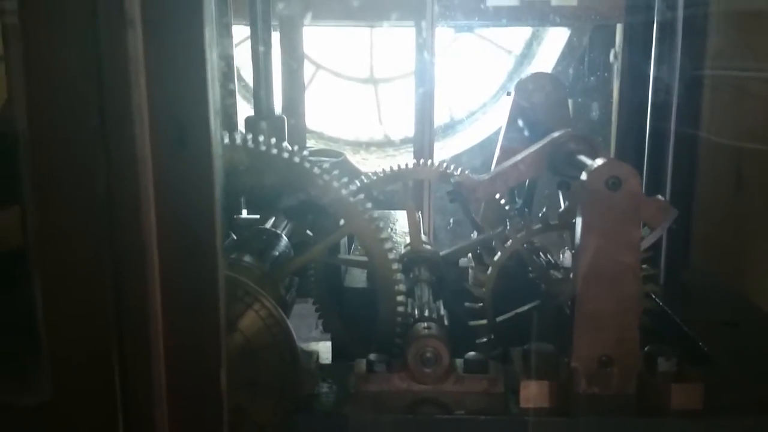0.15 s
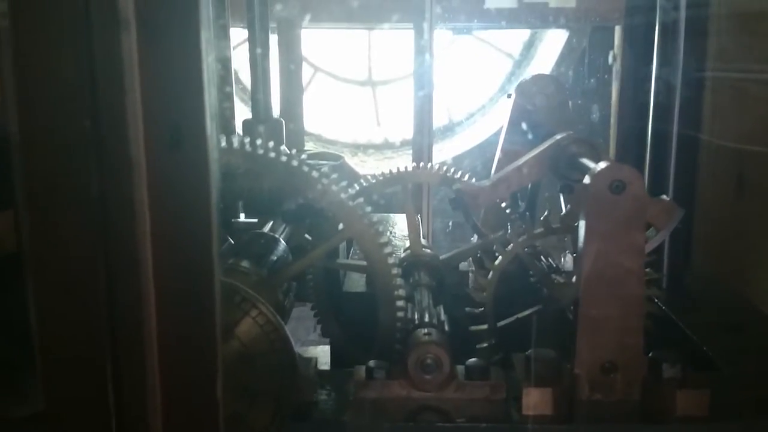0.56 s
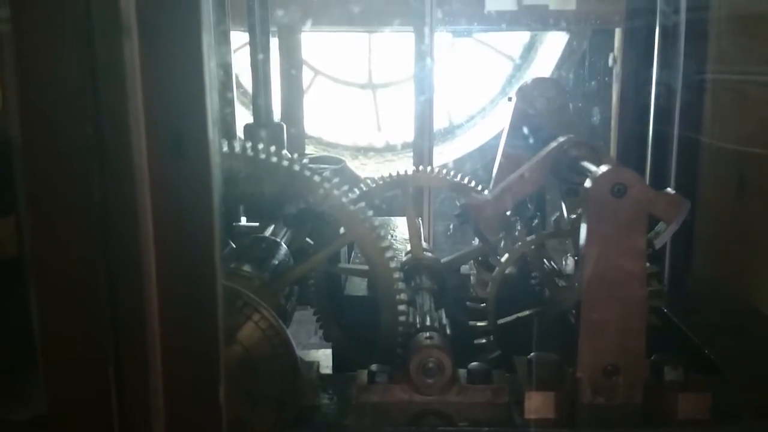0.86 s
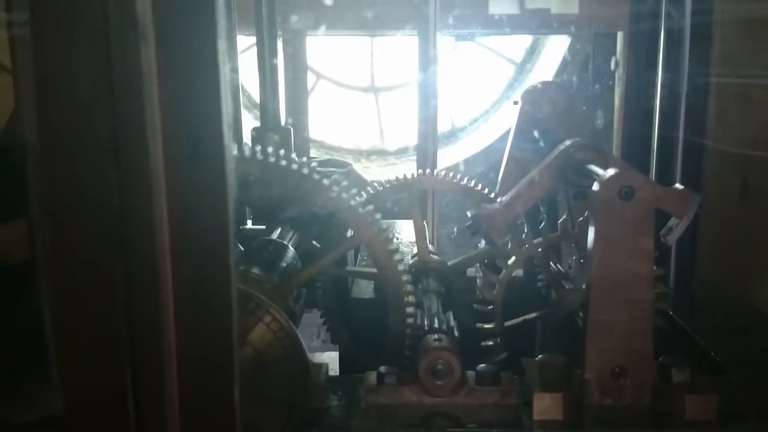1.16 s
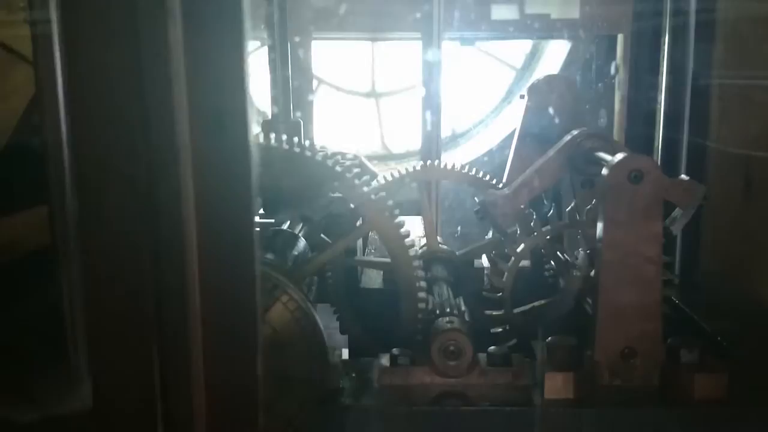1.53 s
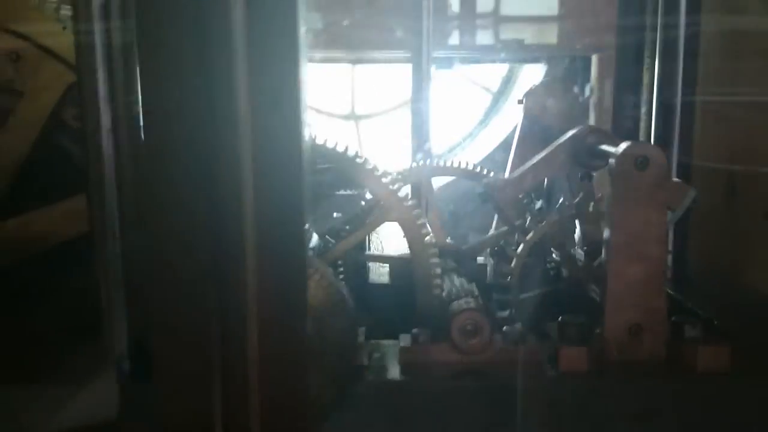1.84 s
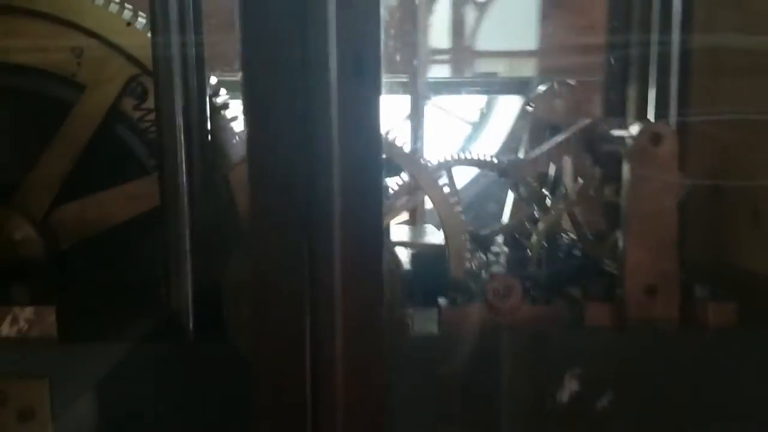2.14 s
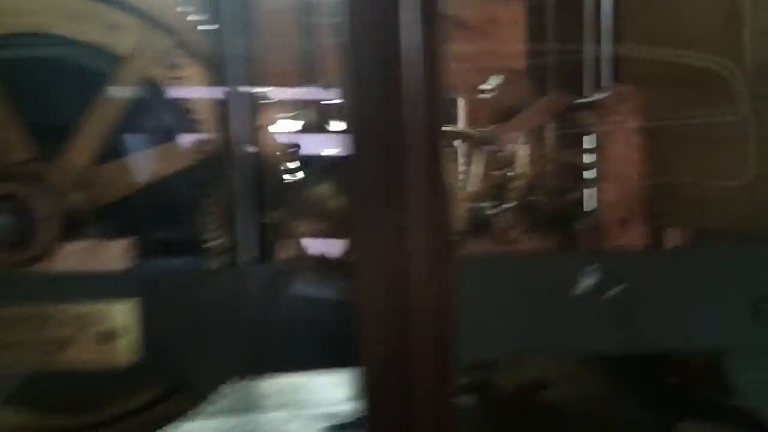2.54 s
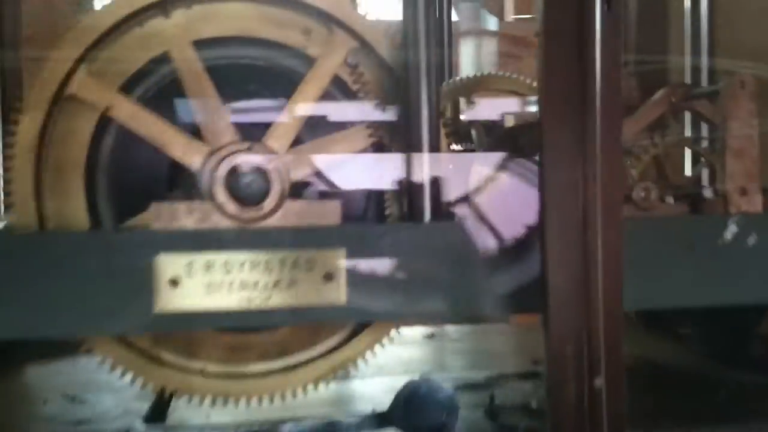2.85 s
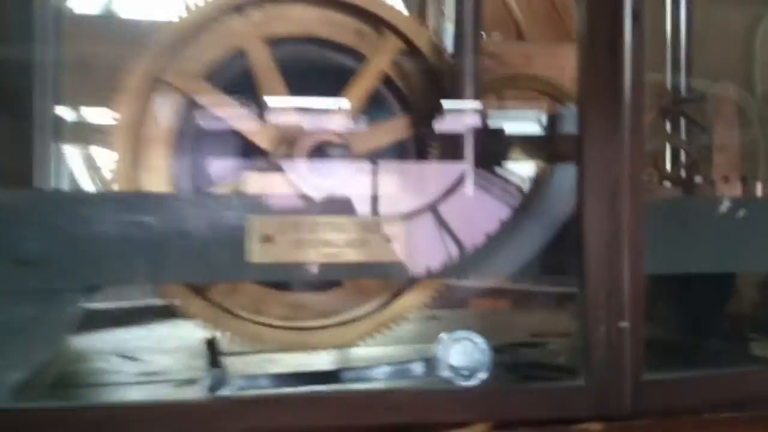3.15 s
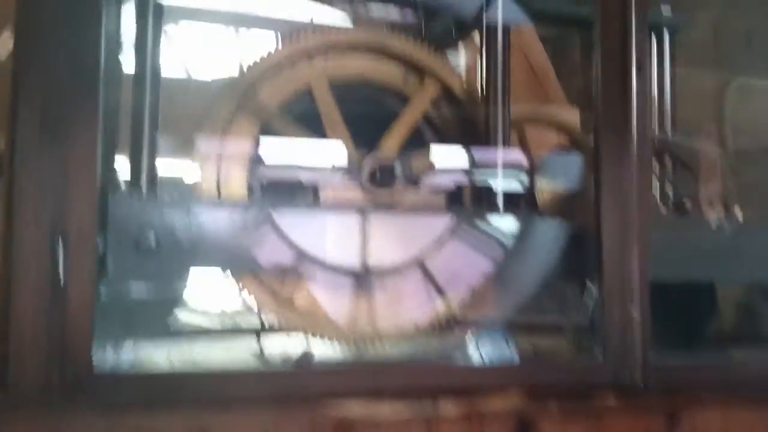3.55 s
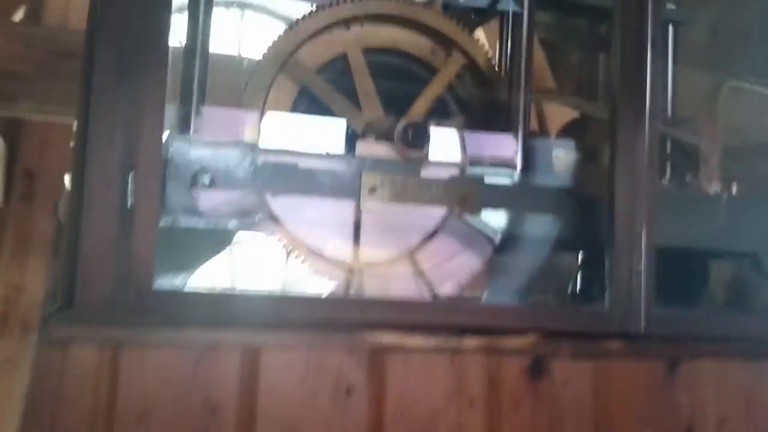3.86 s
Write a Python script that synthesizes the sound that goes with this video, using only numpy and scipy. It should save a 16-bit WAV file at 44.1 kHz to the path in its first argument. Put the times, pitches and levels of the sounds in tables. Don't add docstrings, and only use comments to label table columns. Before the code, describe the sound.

A tower clock movement clunks softly about once a second, tick and tock alternating, in a hushed room; a sharp click and bump come midway, then rubbing and heavy handling thumps on the recorder's right side.

```python
import sys
import numpy as np
from scipy import signal
from scipy.fft import rfft, irfft
from scipy.io import wavfile

SR = 44100
rng = np.random.default_rng(int(sys.argv[2]) if len(sys.argv) > 2 else 0)


def persist_wave(psi):
    counts = np.round(np.clip(psi, -1, 1) * 32767).astype(np.int16)
    wavfile.write(sys.argv[1], SR, np.atleast_2d(counts).T)


def gain_from_decibels(decibels):
    exponent = np.asarray(decibels, float) / 20
    return 10 ** exponent


N = 176400

# frequency in Hz, level in dB per Hz.
HUSH_SPECTRUM = [(40, 0), (64, -1), (200, -12), (300, -12.5), (800, -10.5), (6500, -21), (15800, -22.5)]
# frequency in Hz, likeness 0-1.
LIKENESS = [(60, 0), (290, 0.74), (640, 0.02), (3000, 0)]
# frequency in Hz, width in Hz, gain in dB.
PORT_PEAKS = [
    [(4550, 670, 0.5)],
    [(5630, 670, 9), (14700, 530, 8.5)],
]
# start in seconds, level in dB, left-right in dB, arbor in Hz, arbor level in dB.
BEATS = [
    (-0.2, -42, 3, 1800, -31),
    (0.803, -47, 0, 1803, -6.5),
    (1.827, -49.5, 3.5, 1845, -17),
    (2.801, -47, 3.5, 1535, -12.5),
    (3.826, -49, 6, 1790, -20),
]
# frequency in Hz, level in dB, t60 in seconds,
# left-right in dB.
TICK_MODES = [(350, -1.5, 0.24, 4), (774, -9, 0.17, -3), (1423, 0.5, 0.051, 6), (3140, -16, 0.078, 23),
              (4730, -6, 0.086, 9), (7000, -13, 0.051, 13), (10080, -10, 0.091, 12), (15400, -6, .1, -9)]
TOCK_MODES = [(291.7, 7.5, 0.22, -5.5), (790, -5, 0.084, 7), (1430, 0.5, 0.056, 7), (4710, -4, 0.043, 2),
              (5040, -8, 0.12, -6), (5340, -8.5, 0.14, 4)]
FRONT_TICK_MODES = [(425.3, 8, 0.32, 2), (738, -1.5, 0.11, 16), (1436, -1.5, 0.068, 9),
                    (4870, -18, 0.078, 2)]
# frequency in Hz, level in dB per Hz.
CLUNK_SPECTRUM = [(120, -22), (300, -2), (850, -4.5), (1150, -12.5), (4800, -15.5), (6500, -24.5),
                  (15500, -21.5)]
# frequency in Hz, t60 in seconds.
CASE_T60 = [(150, 0.74), (400, 0.38), (1000, 0.27), (15000, 0.2)]
# start in seconds, thump in dB, knock in dB, thump in Hz, signed direction.
THUMPS = [(0.105, -79, -46, 69.6, 0.47), (2.3, -57, -59, 60, 1), (2.55, -56, -66, 59.4, 1),
          (0.417, -47.5, -61, 55, -0.79), (2.159, -49.5, -45, 69, 0.61), (2.4106, -23, -8.5, 62.7, 0.73),
          (2.494, -37, -46, 78, -0.83), (2.7995, -23, -20.5, 79, 0.94), (2.9, -52, -30, 70, 0.84),
          (3.384, -41, -27, 97, 1), (3.409, -43, -25, 64.6, 0.6), (3.5193, -18.5, -18.5, 72, -0.51),
          (3.5343, -47, -18, 68.4, -0.75), (3.5403, -47, -21, 69, 1), (3.651, -40, -34.5, 62, -1.1),
          (3.743, -19.5, -18.5, 73.4, -1.2), (3.8111, -45, -16, 71.5, -1.1),
          (3.8148, -2.5, -19.5, 55.6, 0.71), (3.852, -10.5, -71, 52.8, 0.49),
          (3.877, -43, -19.5, 60, -0.52), (3.894, -40, -27, 60, -1), (3.934, -12.5, -25.5, 74.6, 0.57),
          (3.966, -15, -8, 65.6, 0.73)]
# frequency in Hz, level in dB, t60 in seconds.
SHELL_MODES = [(334.5, 4.5, 0.011), (536, -10, 0.015), (1810, -16.5, 0.0059)]
# start in seconds, level in dB, frequency in Hz, time to widest swing in seconds,
# signed direction.
PUSHES = [(1.549, -61, 123.5, 0.016, 0.47), (1.701, -63.5, 119, 0.013, 1),
          (2.409, -17.5, 60, 0.0074, -0.98), (2.492, -27, 88, 0.0043, -1.14),
          (3.105, -38.5, 113, 0.0061, -1.12), (3.262, -46, 62, 0.011, -1), (3.341, -35, 104, 0.01, -0.82),
          (3.381, -14.5, 98, 0.0057, -0.65), (3.414, -20, 64.3, 0.011, 1), (3.54, -22, 318, 0.0049, 0.97),
          (3.673, -32.5, 151.7, 0.0085, 0.94), (3.842, -16.5, 76, 0.01, -1.06),
          (3.651, -17, 59.5, 0.011, -1.03), (3.721, -21, 59.4, 0.011, -1.05),
          (3.8102, -10.5, 127, 0.0055, -0.96)]
# start in seconds, level in dB, left-right in dB, pitch in Hz, broad crack in dB.
SNAPS = [(1.559, -61, -9, 4900, 9), (1.574, -52.5, -6, 5100, 7), (1.605, -64, -7, 12100, 8),
         (2.0047, -54.5, -1, 10500, 9), (2.162, -61, 6, 11500, 13.5), (2.361, -52, 13, 4840, 5),
         (3.107, -42, -15.5, 5300, -5), (3.497, -55, -13, 5320, 11), (3.674, -43, -6, 5660, -15),
         (3.966, -33, 12.5, 4330, -4), (2.491, -59.5, -11, 10000, 12), (2.941, -55, 0, 13500, 2)]
# peak in seconds, length in seconds, hiss in dB, right rumble in dB, left-right in dB.
STROKES = [(2.359, 0.023, -53.5, -79, -7), (2.413, 0.15, -58, -57.5, 0), (2.656, 0.039, -63, -63.5, 5),
           (2.704, 0.035, -60, -53.5, 4.5), (2.82, 0.06, -62.5, -43.5, -25), (2.903, 0.038, -52, -50.5, 7),
           (2.962, 0.14, -59.5, -61, 7.5), (3.099, 0.061, -56, -57, 5.5), (3.174, 0.1, -53.5, -55, 3.5),
           (3.222, 0.063, -49, -50.5, 5), (3.287, 0.079, -54.5, -56.5, 2), (3.367, 0.089, -51, -51, 2),
           (3.395, 0.042, -41, -37.5, -8.5), (3.422, 0.038, -46.5, -63, -7),
           (3.473, 0.065, -56.5, -63.5, -5), (3.502, 0.042, -48.5, -46, -5),
           (3.548, 0.033, -55.5, -41.5, 12), (3.618, 0.18, -49, -63, -2), (3.687, 0.051, -40.5, -59, 0),
           (3.748, 0.067, -36, -35, -3.5), (3.797, 0.09, -52, -41, 13), (3.864, 0.089, -45, -44, -1),
           (3.99, 0.21, -42, -43, 1.5)]
# frequency in Hz, level in dB per Hz.
SKIN_SPECTRUM = [(100, -2.5), (500, -7), (1500, -9), (3000, -13), (5000, -4), (7000, -17.5), (11000, -17),
                 (15500, -22.5)]
RUMBLE_SPECTRUM = [(30, -13), (70, -2.5), (200, -12), (400, -8), (650, -13.5), (1000, -19), (2500, -27),
                   (4000, -39.5)]
# frequency in Hz, level in dB, t60 in seconds, left-right in dB.
CATCH_MODES = [(5600, -29.5, 0.012, -17), (5975, -40, 0.03, -4), (4700, -48, 0.023, 9),
               (3650, -43.5, 0.014, 5), (7935, -52, 0.016, 0)]

FRONT_FROM_S = 2.4
HUSH_DB, HUSH_LEFT_BASS_DB, BASS_LUMP_DB = -66.5, -4.5, 2.5
WHINE_HZ, WHINE_DB, WHINE_WAVER_DB = 15000, -77, 2
DRONE_HZ, DRONE_T60_S, DRONE_DB = 269.2, 0.28, -83.5
CONTACT_S, MODES_DB, FRONT_SWELL_S = 0.025, 0.5, 0.015
ARBOR_T60_S, ARBOR_BEAT_HZ, ARBOR_CONTACT_S = 0.36, 24, 0.05
CLUNK_RISE_S, CLUNK_HOLD_S, CLUNK_PATCHY_DB = 0.005, 0.04, 2.5
THUMP_DB, THUMP_T60_S, THUMP_RISE_S, RING_ON_PER_DB = 4.5, 0.036, 0.0009, 0.1333
OVERTONE_RATIO, OVERTONE_DB, OVERTONE_T60_S = 2.34, -4.5, 0.049
KNOCK_DB, KNOCK_RISE_S, KNOCK_SOFT_HZ = 8.5, 0.0016, 2410
LEFT_THUMP_DB, LEFT_KNOCK_DB, LEFT_PUSH_DB = -26, -23.5, -26
SNAP_DECAY_S, SNAP_WIDTH_SHARE, CRACK_DB = 0.0012, 0.064, -3.0
STROKE_RISE_SHARE, STROKE_FALL_SHARE = 0.26, 0.35
RUB_DB, RUB_PATCHY_DB, GRIP_SHARE = -5.5, 2, 0.51
LEFT_RUMBLE_DB, RIGHT_RUMBLE_DB, RUMBLE_PATCHY_DB = -13, 4, 2.95
GRAIN_DB, GRAINS_PER_S = 1.2, 390
CATCH_S, CATCH_CONTACT_S, CATCH_TAIL_DB, CATCH_TAIL_T60_S = 2.3424, 0.00095, -64, 0.95
LOW_CUT_HZ, TOP_HZ = 37.4, 15740


def rms_one(x):
    return x / np.sqrt(np.mean(x ** 2) + 1e-20)


def at_hz(points, hz):
    table = np.array(points)
    return np.interp(np.log(hz), np.log(table[:, 0]), table[:, 1])


def sides(pan_db):
    return gain_from_decibels([[pan_db / 2], [-pan_db / 2]])


def drift(rate_hz):
    knots = rng.standard_normal(int(N / SR * 60) + 2)
    pole = np.exp(-2 * np.pi * rate_hz / 60)
    wander = rms_one(signal.lfilter([1], [1, -pole], knots))
    return np.interp(np.arange(N) / SR * 60, np.arange(len(knots)), wander)


def bands(spectrum, likeness, shape):
    freq = np.maximum(np.arange(N // 2 + 1) * SR / N, 1)
    white = rfft(rng.standard_normal((2, N)), axis=1)
    white = white * gain_from_decibels(at_hz(spectrum, freq)) * (freq > 0.7 * spectrum[0][0])
    alike = np.clip(at_hz(likeness, freq), 0, 1)
    pair = np.sqrt(1 + alike) * white[0] + np.sqrt(1 - alike) * white[1] * [[1], [-1]]
    pair = pair / np.sqrt(np.mean(irfft(pair, N) ** 2))
    out = 0
    for octave in np.arange(4, 14.5, 0.5):
        share = np.clip(1 - 2 * abs(np.log2(freq) - octave), 0, 1)
        out = out + shape(2 ** octave) * irfft(pair * share, N)
    return out


def ring(x, hz, t60_s):
    r, w = gain_from_decibels(-60 / (t60_s * SR)), 2 * np.pi * hz / SR
    return signal.lfilter([0, np.sin(w)], [1, -2 * r * np.cos(w), r * r], x + 1e-18)


def swing(a, hz, rise_s):
    return (1 - np.exp(-a / rise_s)) * np.sin(2 * np.pi * hz * a)


def ports(x):
    out = x.copy()
    for side, peaks in enumerate(PORT_PEAKS):
        for hz, width_hz, db in peaks:
            r = np.exp(-np.pi * width_hz / SR)
            poles = [1, -2 * r * np.cos(2 * np.pi * hz / SR), r * r]
            out[side] += gain_from_decibels(db) * signal.lfilter([(1 - r * r) / 2, 0, (r * r - 1) / 2], poles, x[side])
    return out


def noise_floor():
    def lumps(hz):
        left_right_db = np.array([[HUSH_LEFT_BASS_DB], [1]])
        return gain_from_decibels((BASS_LUMP_DB * drift(3.5) + left_right_db) * (hz < 130))

    t = np.arange(N) / SR
    hush = gain_from_decibels(HUSH_DB) * bands(HUSH_SPECTRUM, LIKENESS, lumps)
    whine = gain_from_decibels(WHINE_DB + WHINE_WAVER_DB * drift(3)) * np.sin(2 * np.pi * WHINE_HZ * t)
    return hush + whine * (t < FRONT_FROM_S) * [[1], [0]]


def drone():
    return gain_from_decibels(DRONE_DB) * rms_one(ring(rng.standard_normal((2, N)), DRONE_HZ, DRONE_T60_S))


def frame_ring():
    out, a = np.zeros((2, N)), np.arange(SR // 2 + SR // 4) / SR
    for k, (s, db, pan_db, arbor_hz, arbor_db) in enumerate(BEATS):
        i, front = int(s * SR), s > FRONT_FROM_S
        tick = FRONT_TICK_MODES if front else TICK_MODES
        modes = [(*mode, CONTACT_S) for mode in (TOCK_MODES if k % 2 == 0 else tick)]
        for way in (-1, 1):
            modes.append((arbor_hz + way * ARBOR_BEAT_HZ / 2, arbor_db, ARBOR_T60_S, 2, ARBOR_CONTACT_S))
        for hz, mode_db, t60_s, mode_pan_db, contact_s in modes:
            grind = rng.standard_normal((2, len(a))) * np.exp(-a / contact_s)
            rung = ring(grind, hz, t60_s)
            if front:
                rung = rung * np.minimum(a / FRONT_SWELL_S, 1)
            rung = rung / abs(rung).max(axis=1, keepdims=True)
            rung = gain_from_decibels(db + mode_db + MODES_DB) * sides(pan_db + mode_pan_db) * rung
            out[:, max(i, 0):i + len(a)] += rung[:, max(-i, 0):N - i]
    return out


def case_clunk():
    t = np.arange(N) / SR

    def dying(hz):
        level = 0
        for s, db, pan_db, _, _ in BEATS:
            a = np.maximum(t - s, 0)
            fall = gain_from_decibels(-60 * np.maximum(a - CLUNK_HOLD_S, 0) / at_hz(CASE_T60, hz))
            level = level + gain_from_decibels(db) * sides(pan_db) * np.minimum(a / CLUNK_RISE_S, 1) * fall
        return level * gain_from_decibels(CLUNK_PATCHY_DB * drift(25))

    return bands(CLUNK_SPECTRUM, LIKENESS, dying)


def thumps():
    t, low, knock = np.arange(N) / SR, np.zeros(N), np.zeros(N)
    for s, thump_db, knock_db, hz, way in THUMPS:
        a = np.maximum(t - s, 0)
        t60_s = THUMP_T60_S * (1 + RING_ON_PER_DB * max(thump_db - knock_db, 0))
        low += way * gain_from_decibels(thump_db + THUMP_DB - 60 * a / t60_s) * swing(a, hz, THUMP_RISE_S)
        overtone = swing(a, OVERTONE_RATIO * hz, THUMP_RISE_S)
        low += way * gain_from_decibels(thump_db + OVERTONE_DB - 60 * a / OVERTONE_T60_S) * overtone
        for mode_hz, db, ring_s in SHELL_MODES:
            knock += way * gain_from_decibels(knock_db + db - 60 * a / ring_s) * swing(a, mode_hz, KNOCK_RISE_S)
    soften = signal.butter(4, KNOCK_SOFT_HZ, fs=SR, output="sos")
    knock = gain_from_decibels(KNOCK_DB) * signal.sosfilt(soften, knock)
    left = np.roll(low, 60) * gain_from_decibels(LEFT_THUMP_DB) + np.roll(knock, 40) * gain_from_decibels(LEFT_KNOCK_DB)
    return np.array([left, low + knock])


def pushes():
    t, out = np.arange(N) / SR, 0
    for s, db, hz, widest_s, way in PUSHES:
        a = np.maximum(t - s, 0)
        swell = (a / widest_s * np.exp(1 - a / widest_s)) ** 2
        out = out + way * gain_from_decibels(db) * swell * np.sin(2 * np.pi * hz * a)
    return out * gain_from_decibels([[LEFT_PUSH_DB], [0]])


def snaps():
    out, a = np.zeros((2, N)), np.arange(SR // 50) / SR
    high = signal.butter(2, 2000, "high", fs=SR, output="sos")
    for s, db, pan_db, hz, crack_db in SNAPS:
        i = int(s * SR)
        spike = rng.standard_normal((2, len(a))) * np.exp(-a / SNAP_DECAY_S)
        edges_hz = [hz * (1 - SNAP_WIDTH_SHARE), hz * (1 + SNAP_WIDTH_SHARE)]
        pitched = signal.sosfilt(signal.butter(2, edges_hz, "band", fs=SR, output="sos"), spike)
        pitched = pitched / abs(pitched).max(axis=1, keepdims=True)
        snap = pitched + gain_from_decibels(crack_db + CRACK_DB) * signal.sosfilt(high, spike)
        out[:, i:i + len(a)] += gain_from_decibels(db) * sides(pan_db) * snap[:, :N - i]
    return out


def grain():
    knots = rng.exponential(1, int(N / SR * 400) + 2)
    steps = np.interp(np.arange(N) / SR * GRAINS_PER_S, np.arange(len(knots)), knots)
    return gain_from_decibels(GRAIN_DB * (steps - 1.5))


def rubbing():
    t, hiss, rumble = np.arange(N) / SR, 0, 0
    for s, length_s, hiss_db, rumble_db, pan_db in STROKES:
        rise = -0.5 * ((t - s) / (length_s * STROKE_RISE_SHARE)) ** 2
        fall = 1 - np.hypot(1, (t - s) / (length_s * STROKE_FALL_SHARE))
        swell = np.exp(np.where(t < s, rise, fall))
        hiss = hiss + gain_from_decibels(hiss_db) * sides(pan_db) * swell
        rumble = rumble + gain_from_decibels(rumble_db) * swell
    apart, grip = [(100, 0), (200, 0)], drift(25)
    skin = hiss * bands(SKIN_SPECTRUM, apart,
                        lambda hz: gain_from_decibels(RUB_PATCHY_DB * (GRIP_SHARE * grip + drift(30)) + RUB_DB))
    low = bands(RUMBLE_SPECTRUM, apart, lambda hz: gain_from_decibels(RUMBLE_PATCHY_DB * (grip + drift(25))))
    low = rumble * gain_from_decibels([[LEFT_RUMBLE_DB], [RIGHT_RUMBLE_DB]]) * low
    return ports(skin * grain()) + low


def catch():
    a = np.arange(N) / SR - CATCH_S
    after, click = np.maximum(a, 0), 0
    for hz, db, t60_s, pan_db in CATCH_MODES:
        click = click + gain_from_decibels(db - 60 * after / t60_s) * sides(pan_db) * swing(after, hz, CATCH_CONTACT_S)
    tail = gain_from_decibels(CATCH_TAIL_DB - 60 * after / CATCH_TAIL_T60_S) * (a > 0) * rng.standard_normal((2, N))
    return click + ports(tail)


def scene():
    clock = ports(frame_ring() + case_clunk())
    hand = thumps() + pushes() + snaps() + rubbing() + catch()
    return noise_floor() + drone() + clock + hand


def band_limit(x):
    return signal.sosfilt(signal.butter(12, 16400, fs=SR, output="sos"), x)


def record(dry):
    low_cut = signal.butter(3, LOW_CUT_HZ, "high", fs=SR, output="sos")
    top_cut = signal.ellip(12, 0.5, 70, TOP_HZ, fs=SR, output="sos")
    mix = signal.sosfilt(top_cut, signal.sosfilt(low_cut, dry))
    return band_limit(mix)


dry = scene()
out = record(dry)
persist_wave(out)
```